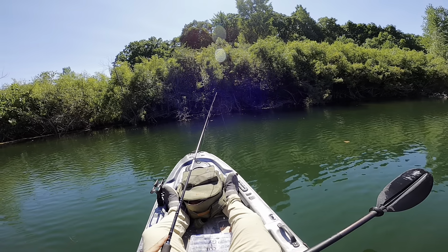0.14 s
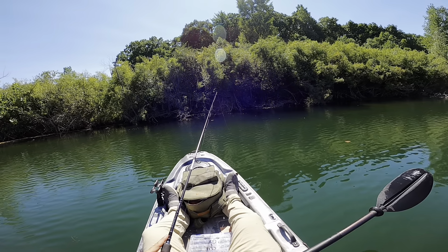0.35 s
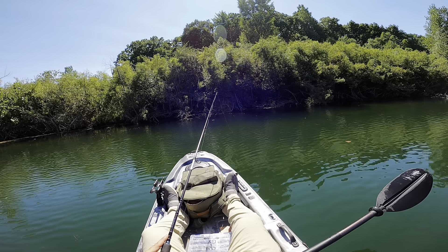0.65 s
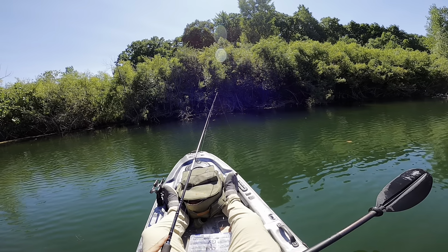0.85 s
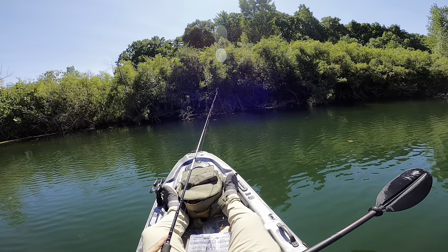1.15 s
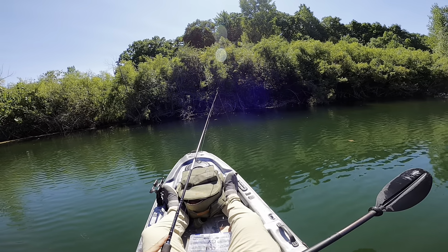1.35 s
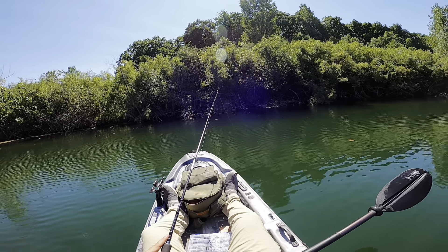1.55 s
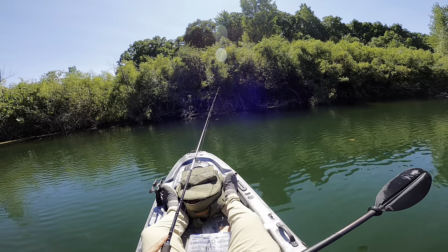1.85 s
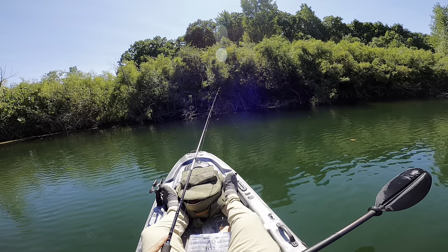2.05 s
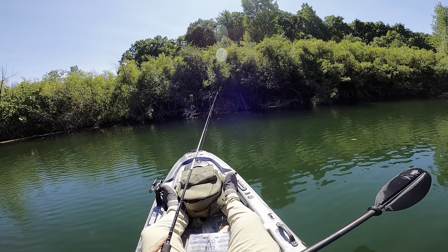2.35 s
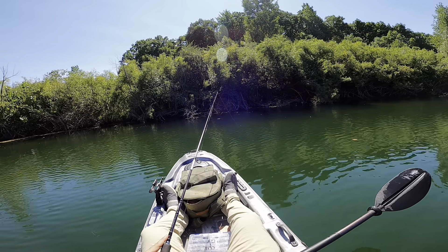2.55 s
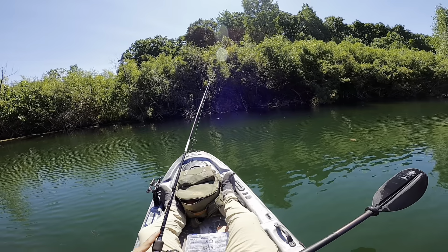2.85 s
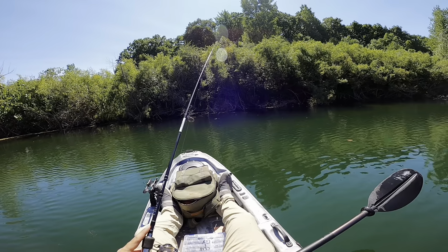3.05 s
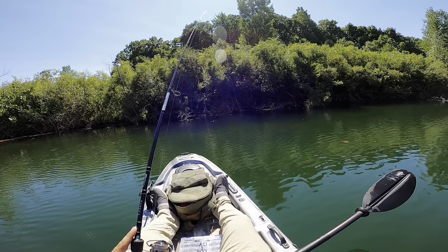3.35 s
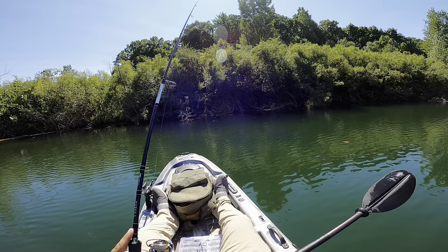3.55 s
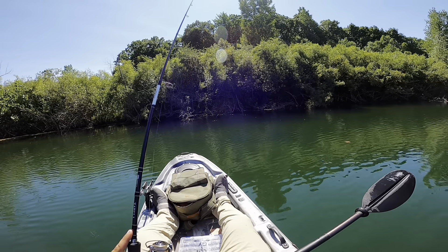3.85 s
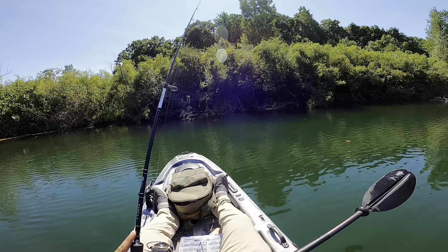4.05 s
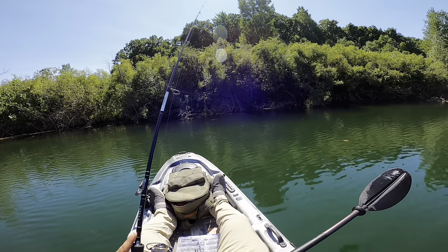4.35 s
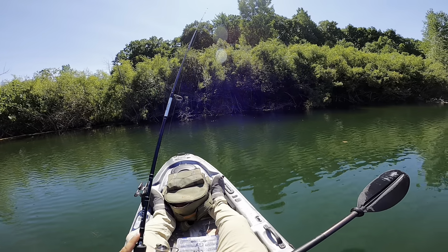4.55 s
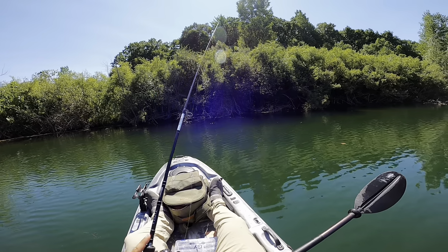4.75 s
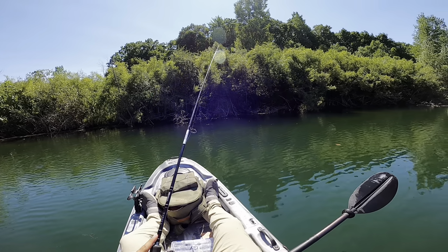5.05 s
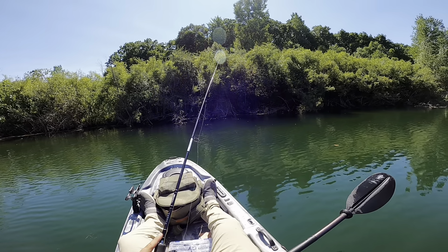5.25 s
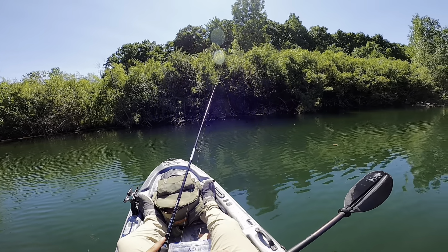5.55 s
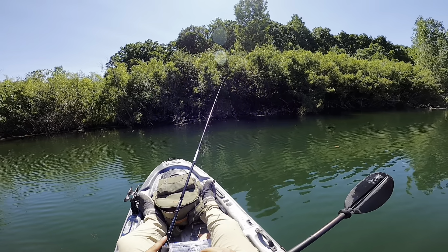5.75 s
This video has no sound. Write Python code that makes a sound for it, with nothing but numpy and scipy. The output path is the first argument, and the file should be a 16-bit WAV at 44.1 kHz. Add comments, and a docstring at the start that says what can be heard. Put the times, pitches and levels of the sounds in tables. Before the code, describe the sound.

A dense summer insect chorus fills the stereo field over soft leaf hush and distant traffic. A low engine drone is strongest in the first second, then drops in pitch and wavers. Quick rising bird chirps rattle at intervals, with a thin whistle between the last two bursts. A very high katydid rasp comes and goes; a sleeve brushes close by and a rod clicks dryly.

```python
"""A summer pond, from a kayak: cicadas and crickets on the wooded bank are bands of pulsing noise and a pure trill.
Right of the microphones a katydid ticks and buzzes, its wing strokes gating noise and a high ring.
A far engine hums in three wavering orders and slows down; far traffic and leaves are a hush of shaped noise.
A bird rattles bursts of rising chirps built from harmonics; another gives a thin whistle and a fainter short note.
Close by, a sleeve rustles in cloth-coloured noise as the angler moves the rod, which ticks twice in damped modes."""
import sys
import numpy as np
from scipy import signal
from scipy.fft import rfft, irfft, next_fast_len
from scipy.io import wavfile
from scipy.ndimage import uniform_filter1d

SR = 44100
rng = np.random.default_rng(int(sys.argv[2]) if len(sys.argv) > 2 else 0)


def digitize_waveform(pressure):
    """Quantize a signal to 16-bit integers and store it at the path in sys.argv[1].

    Rows of a 2-D input are taken as channels; values are limited to [-1, 1].
    """
    field = np.atleast_2d(pressure).T
    bounded = np.clip(field, -1, 1)
    quanta = np.round(bounded * 32767).astype(np.int16)
    wavfile.write(sys.argv[1], SR, quanta)


N = 260410
T = np.arange(N) / SR  # time [s]


def undb(db):
    """Decibels to an amplitude factor."""
    return 10 ** (np.asarray(db) / 20)


def unit(x):
    """Scale to rms 1."""
    return x / np.sqrt(np.mean(x ** 2))


def curves(table):
    """Columns of a (time, value, ...) table at every sample."""
    times, *columns = np.transpose(table)
    return [np.interp(T, times, column) for column in columns]


def over_hz(table, hz):
    """Read a (frequency, value) table on a log frequency axis."""
    freqs, values = np.transpose(table)
    return np.interp(np.log(hz + 1), np.log(freqs), values)


def pan(db):
    """Gains of left and right for a left minus right level difference."""
    return undb(np.array([[db], [-db]]) / 2)


def bump(t, width):
    """Bell-shaped swell around zero."""
    return np.exp(-(t / width) ** 2)


def gate(start, end, attack, release):
    """Ramp up from the start, hold, ramp down after the end."""
    rising = (T - start) / attack
    falling = 1 + (end - T) / release
    return np.clip(np.minimum(rising, falling), 0, 1)


def noise(gain_at, alike, pan_db):
    """Coloured noise, partly the same in both channels; mid rms near 1 before panning."""
    size = next_fast_len(N)
    alike = np.clip(alike, 0, 1)
    gain = gain_at(np.arange(size // 2 + 1) * SR / size)
    mid, side = irfft(rfft(rng.standard_normal((2, size))) * gain, size)[:, :N]
    opposite = side * np.array([[1], [-1]])
    return pan(pan_db) * (np.sqrt(1 + alike) * mid + np.sqrt(1 - alike) * opposite) / np.std(mid)


def coloured(table, alike, pan_db):
    """Noise with the spectrum of a table, silent outside it."""
    lowest, highest = table[0][0], table[-1][0]
    return noise(lambda hz: undb(over_hz(table, hz)) * (hz > lowest) * (hz < highest), alike, pan_db)


def walk(rate):
    """Random levels held 1 / rate s and slewed twice; spread 1."""
    k = int(SR / rate)
    steps = np.repeat(rng.standard_normal(N // k + 1), k)
    w = uniform_filter1d(uniform_filter1d(steps, k), k)[:N]
    return unit(w - w.mean())


def throb(rate, sharp, drift):
    """One smooth bump per pulse at a slightly wandering rate; rms 1."""
    phase = 2 * np.pi * np.cumsum(rate * (1 + drift * walk(6))) / SR
    return unit(np.exp(sharp * np.cos(phase)))


def bank(x, wet_db, t60):
    """Scattered echoes from trees and water: decaying noise, different in each channel."""
    t = T[:SR]
    tail = rng.standard_normal((2, len(t))) * np.exp(-np.log(1000) * t / t60) * (t > .004)
    tail /= np.sqrt(np.sum(tail ** 2, axis=1, keepdims=True))
    return x + undb(wet_db) * signal.fftconvolve(x[None], tail, axes=1)[:, :N]


# insect choirs on the bank: (centre [Hz], width at half amplitude [Hz], level [dB], pulse rate [1/s],
# throb depth [0-1], left minus right [dB], likeness of the channels [0-1])
CHOIR_BANDS = [(3840, 330, -64, 53.5, 0.18, 8, 0.8), (4202, 283, -63, 51.5, 0.25, 8.5, 0.5),
               (4430, 275, -66.5, 110, 0.35, 3.5, 0.12), (6430, 200, -71.5, 39, 0.52, -0.5, 0.34),
               (6700, 89, -75, 48, 0, 0, 0.33), (7550, 720, -71.5, 42, 0.14, 10.5, 0.52),
               (7160, 1840, -66.5, 33, 0.13, 6, 0.1), (8390, 950, -73.5, 41, 0.01, 11.5, 0.2),
               (5860, 190, -79.5, 26, 0, 8, 0.05), (4000, 46, -71.5, 50, 0, 4, 0.5)]


def choirs():
    """Many singers blur into noise in their body resonance; the nearest leave a throb at the pulse rate."""
    out = 0
    for hz, width, db, rate, depth, pan_db, alike in CHOIR_BANDS:
        band = noise(lambda f: 1 / (1 + (2 * (f - hz) / width) ** 4), alike, pan_db)
        depth = np.clip(depth, 0, 1)
        pulsing = 1 - depth + depth * throb(rate, 1.8, 0.0197)
        level = undb(db + 0.06 * walk(2.7) + 0.1 * walk(14))
        out = out + level * pulsing * band
    return out


# level of the one clear cricket: (time [s], level [dB])
CRICKET_LEVEL = [(0.6, -81), (0.8, -74), (1.4, -75), (2.7, -77), (3.7, -76), (4.1, -80), (5.9, -83)]
CRICKET_HZ, CRICKET_RATE = 3365, 38.2  # mean pitch [Hz], pulses per second


def cricket():
    """A steady trill of short pure pulses, with close echoes, to the left."""
    tone = np.sin(2 * np.pi * np.cumsum(CRICKET_HZ * (1 + .004 * walk(30))) / SR)
    pulses = throb(CRICKET_RATE, 2.5, .006) * tone
    level = undb(curves(CRICKET_LEVEL)[0] + 1.5 * walk(9))
    return bank(level * pulses, -9, .08) * pan(7)


# katydid's buzzes: (start [s], end [s], wing strokes [1/s], rasp level [dB], wing ring level [dB])
KATYDID_BUZZES = [(0, 0.662, 56, -76.5, -81), (0.92, 1.42, 52.4, -75, -77), (1.412, 1.856, 62, -76, -80),
                  (2.359, 3.631, 65, -75.5, -74.5), (3.897, 4.572, 58.6, -73.5, -82),
                  (4.56, 5.155, 61, -77.5, -78), (5.45, 5.9, 61, -74, -78)]
# its single ticks: (time [s], level before a common trim [dB])
KATYDID_TICKS = [(0.6038, -67), (0.6594, -63), (0.7063, -64), (0.7565, -65), (0.8135, -65), (0.8594, -69),
                 (1.9023, -79), (1.948, -82), (1.9897, -75), (2.0399, -73), (2.0881, -66), (2.144, -66),
                 (2.1935, -65), (2.2514, -69), (2.3053, -65), (3.6234, -64), (3.674, -62), (3.726, -63),
                 (3.7737, -62), (3.8292, -62), (3.8731, -66), (5.0494, -65), (5.1067, -63), (5.1682, -64),
                 (5.2242, -64), (5.2797, -69), (5.3358, -61)]
# rasp spectrum of the wing: (frequency [Hz], relative level per Hz [dB])
WING_SPECTRUM = [(8800, -2), (9700, -4), (10400, -1), (11000, -4), (12000, -2), (13000, -5), (13600, -2.5),
                 (14500, -4), (15300, -7), (15800, -24)]
# spectrum of the reverberant hiss: (frequency [Hz], relative level per Hz [dB])
REVERB_SPECTRUM = [(5180, -12.5), (8800, -8.5), (9300, -13.5), (9770, -12), (12000, -9.5), (12500, -9),
                   (14100, -16), (15200, -21), (15700, -36)]
# the high hiss dips while the katydid only ticks: (end of the fall [s], recovery [s], depth [dB])
HISS_LULLS = [(.6, .45, 7), (1.84, 0.49, 18.5), (3.62, 0.33, 6), (5.1, 0.31, 10)]
LULL_FALL_S = 0.044
RING_HZ = 12000  # centre of the wobbling wing ring
MIRROR_HZ, MIRROR_WIDTH_HZ = 12300, 600  # ringing cell of the wing under single ticks
REVERB_DB = -69  # hiss outside the lulls


def katydid():
    """Wing strokes gate a rasp of file teeth and ring the wing; the buzz scatters into a smooth reverberant hiss."""
    strokes, ring, ticks = np.zeros((3, N))
    uneven = undb(1.0 * walk(50))
    wobble = np.cumsum(120 * walk(250)) / SR  # in cycles
    for start, end, rate, rasp_db, ring_db in KATYDID_BUZZES:
        envelope = np.clip(np.minimum((T - start) / 0.02, (end - T) / 0.0091), 0, 1)
        beating = envelope * throb(rate, 0.84, 0.0061)
        strokes += undb(rasp_db) * beating
        ring += undb(ring_db) * beating
    ring *= np.sin(2 * np.pi * (RING_HZ * T + wobble))
    for s, db in KATYDID_TICKS:
        u = np.clip((T - s + .003) / 0.0072, 0, 50)
        ticks += undb(db - 7.5) * u * np.exp(1 - u)
    cell = noise(lambda f: 1 / (1 + (2 * (f - MIRROR_HZ) / MIRROR_WIDTH_HZ) ** 2), 0.55, -12)
    rasp = (strokes + ticks) * coloured(WING_SPECTRUM, 0.64, -6)
    direct = rasp + undb(-6) * ticks * cell + ring * pan(-14)
    lull_db = sum(depth_db * gate(s - LULL_FALL_S, s, LULL_FALL_S, back) for s, back, depth_db in HISS_LULLS)
    hiss_level = undb(REVERB_DB - lull_db + 1.0 * walk(25.04))
    return uneven * direct + hiss_level * coloured(REVERB_SPECTRUM, 0.12, -2.0)


# spectrum of the engine's rumble: (frequency [Hz], relative level per Hz [dB])
RUMBLE_SPECTRUM = [(20, -6), (35, 9), (45, 16.5), (60, 10), (80, 9.5), (120, 1), (160, -1), (220, -5.5),
                   (300, -18.5), (400, -23.5)]
# rise and fall of the rumble: (time [s], level [dB])
RUMBLE_LEVEL = [(0, -44.5), (.9, -43.5), (1.35, -49.5), (2.9, -50.5), (3.6, -48.5), (5.9, -47)]
LOAD_HZ, IDLE_HZ = 60.3, 50.3  # mean firing rate
THROTTLE_OFF_S, SLOWING_S = .63, 0.3015  # start and length of the slowing
# levels (under load, at idle) [dB]
FIRING_DB, SECOND_ORDER_DB, THIRD_ORDER_DB = (-31.5, -45.5), (-62, -50.5), (-66, -61.5)


def engine():
    """Firing tone and its orders waver on the way over the water; a rumble goes with them."""
    idle = np.clip((T - THROTTLE_OFF_S) / SLOWING_S, 0, 1)

    def level(pair):
        """Slide from the load level to the idle level."""
        return undb(pair[0] + (pair[1] - pair[0]) * idle)

    hz = LOAD_HZ + (IDLE_HZ - LOAD_HZ) * idle + .5 * walk(4)
    phase = 2 * np.pi * np.cumsum(hz) / SR
    # the firing tone is steady under load, uneven at idle
    tone = level(FIRING_DB) * undb((-0.15 + 3.47 * idle) * walk(10)) * np.sin(phase)
    tone += level(SECOND_ORDER_DB) * undb(2.75 * walk(9)) * np.sin(2 * phase)
    tone += level(THIRD_ORDER_DB) * undb(3.4 * walk(5)) * np.sin(3 * phase)
    rumble_level = undb(curves(RUMBLE_LEVEL)[0] + 0.56 * walk(2.36))
    rumble = rumble_level * coloured(RUMBLE_SPECTRUM, 0.93, 2.1)
    return np.sqrt(2) * tone * pan(2.3) + rumble


# spectrum of the far traffic: (frequency [Hz], relative level per Hz [dB])
TRAFFIC_SPECTRUM = [(200, -1.5), (400, -2), (700, -10), (1100, -2.5), (1500, -7), (2200, -20), (2600, -33)]
# rise and fall of the traffic: (time [s], level [dB])
TRAFFIC_LEVEL = [(0.0, -64), (0.43, -62.5), (0.85, -65.5), (2.7, -67), (3.09, -64), (3.42, -67.5),
                 (5.06, -67.5), (5.45, -64.5), (5.9, -67.5)]


def traffic():
    """Far traffic merges into low noise that slowly swells."""
    return undb(curves(TRAFFIC_LEVEL)[0] + 0.34 * walk(5.4)) * coloured(TRAFFIC_SPECTRUM, 0.55, 1.3)


# spectrum of the hush of leaves: (frequency [Hz], relative level per Hz [dB])
LEAVES_SPECTRUM = [(1500, 2.5), (2200, 1.5), (2900, -1), (3600, 7.5), (5200, 8.5), (9000, -3.5),
                   (11000, -41)]
LEAVES_DB = -67.5


def leaves():
    """Countless small rustles blur into an unsteady hush of noise."""
    return undb(LEAVES_DB + 2.3 * walk(11)) * coloured(LEAVES_SPECTRUM, 0.71, 4.1)


# rattling bird: (time of first accent [s], level [dB], end pitch [Hz], croak over second harmonic [dB])
RATTLE_CHIRPS = [(0.0242, -59, 1210, -4), (0.0952, -60, 1170, -3), (1.2633, -62.5, 1190, -4),
                 (1.314, -53.5, 1090, -8), (1.3777, -51.5, 1135, -3.5), (1.4418, -52, 1200, -6),
                 (1.5046, -47, 1230, -13), (1.5747, -49, 1182, -8), (1.6553, -49, 1130, -6),
                 (2.866, -52, 1075, -3), (2.9118, -52.5, 1130, -5), (2.965, -59, 1230, -4),
                 (3.017, -50.5, 1120, -9), (3.0769, -49.5, 1166, -6), (3.1404, -47, 1197, -10),
                 (3.2075, -48.5, 1160, 0), (4.3516, -64, 1140, -4), (4.392, -47.5, 1160, -15),
                 (4.4382, -54.5, 1114, -3), (4.4922, -49, 1242, -10), (4.5484, -48.5, 1160, -8),
                 (4.6059, -49, 1250, -9), (4.6716, -46, 1158, -9.5), (4.7343, -47.5, 1190, -4.5),
                 (4.8034, -48.5, 1162, -6.5)]
CHIRP_HZ = 1023  # pitch at the first accent
CROAK_LEAD_S, RISE_HZ_PER_S = 0.0032, 14000  # the croak leads the first accent; pitch slope up to there
GLIDE_S, GLIDE_S_PER_HZ = 0.0059, 3.5e-5  # a wider glide takes longer
ACCENT_DB, ACCENT_DB_PER_HZ = -16, 0.0892  # and ends in a stronger second accent
THROAT_HZ, THROAT_WIDTH_HZ = 3450, 230  # resonance that the third harmonic sweeps through
TOP_PER_CROAK = 0.39  # harsher chirps also ring the throat more [dB per dB]
# mean levels: first harmonic, third harmonic late and early (dB over the second harmonic),
# lower and upper croak line (dB over the croak); each chirp scatters around them
PARTIALS_DB, PARTIAL_SCATTER_DB = [-7, -1.5, -10, -1, 0], 1.2


def rattler():
    """Each chirp starts in a croak of alternating strong and weak cycles, then three harmonics glide up."""
    out = np.zeros(N)
    lead = SR // 50  # samples before the first accent
    t = np.arange(-lead, SR // 25) / SR
    scatter = PARTIAL_SCATTER_DB * rng.standard_normal((len(RATTLE_CHIRPS), len(PARTIALS_DB)))
    for (s, db, end_hz, croak_db), partials in zip(RATTLE_CHIRPS, PARTIALS_DB + scatter):
        first_db, late_db, early_db, low_db, high_db = partials
        rise = end_hz - CHIRP_HZ
        gap = GLIDE_S + GLIDE_S_PER_HZ * rise
        accent_db = ACCENT_DB + ACCENT_DB_PER_HZ * rise
        glide = np.sin(np.pi / 2 * np.clip(t / gap, 0, 1)) ** 1.57
        hz = CHIRP_HZ + RISE_HZ_PER_S * np.minimum(t, 0) + rise * glide
        phase = 2 * np.pi * np.cumsum(hz) / SR
        first = undb(first_db) * bump(t - 0.62 * gap, 0.0095)
        second = bump(t, 0.0047) + undb(accent_db) * bump(t - gap, 0.0037)
        throat = bump(3 * hz - THROAT_HZ, THROAT_WIDTH_HZ)
        third = undb(early_db) * bump(t - .001, 0.005)
        third += undb(late_db + TOP_PER_CROAK * croak_db) * bump(t - gap, .007) * throat
        # the alternation puts lines halfway between the harmonics
        croak = undb(low_db) * np.sin(1.5 * phase) + undb(high_db) * np.sin(2.5 * phase)
        croak *= undb(croak_db) * bump(t + CROAK_LEAD_S, 0.0051)
        note = first * np.sin(phase) + second * np.sin(2 * phase) + third * np.sin(3 * phase)
        i = int(s * SR) - lead
        out[i:i + len(t)] += (undb(db) * (note + croak))[:N - i]
    out *= undb(2.5 * walk(400))
    near, far = bank(out, -10, .06), bank(out, -8, .9)
    return (near + far - out) * pan(0.76)  # the direct sound counts once


# sleeve sliding close to the microphones: (start [s], end [s], level [dB])
SLEEVE_SLIDES = [(2.95, 3.31, -59.5), (4.795, 5.74, -66.5)]
SLEEVE_ATTACK_S, SLEEVE_RELEASE_S = .12, .07
# spectrum of the cloth: (frequency [Hz], relative level per Hz [dB])
CLOTH_SPECTRUM = [(250, -20), (380, 2.5), (550, -8.5), (800, -19.5), (1200, -10.5), (2000, -15.5),
                  (3200, -16), (6000, -23.5), (9000, -38)]
# ticks of the rod: (time [s], level [dB])
ROD_TICKS = [(2.975, -61), (4.5043, -42)]
# modes of the rod: (frequency [Hz], relative level [dB], decay by 60 dB [s])
ROD_MODES = [(1050, -10, .012), (1920, 0, .01), (2790, 5, 0.008), (5150, 4, 0.01), (5550, 8, 0.011),
             (6000, 7, .009)]
CONTACT_S, ROD_PAN_DB = .0006, 7  # onset time; the ticks are louder on the left


def angler():
    """Cloth slides in uneven rustles of noise; the rod gives dry ticks of fast-damped modes."""
    slide = sum(undb(db) * gate(s0, s1, SLEEVE_ATTACK_S, SLEEVE_RELEASE_S) for s0, s1, db in SLEEVE_SLIDES)
    out = slide * undb(1.3 * walk(25)) * coloured(CLOTH_SPECTRUM, 1.0, 0.54)
    for s, db in ROD_TICKS:
        t = np.clip(T - s, 0, 1)
        modes = 0
        for hz, mode_db, t60 in ROD_MODES:
            modes = modes + undb(mode_db) * np.exp(-np.log(1000) * t / t60) * np.sin(2 * np.pi * hz * t)
        out += undb(db) * pan(ROD_PAN_DB) * (1 - np.exp(-t / CONTACT_S)) * modes
    return out


# whistling bird: (start [s], length [s], third harmonic at the start [Hz], level before the swell [dB])
WHISTLE_NOTES = [(3.42, .225, 2540, -63.5), (3.69, 0.052, 2460, -75)]
WHISTLE_ATTACK_S, WHISTLE_RELEASE_S, WHISTLE_SWELL_DB_PER_S = 0.03, 0.014, 15
SAG_HZ_PER_S, DROP_HZ = 180, 60  # of the third harmonic; the drop takes the last 50 ms
SECOND_DB, FOURTH_DB, FOURTH_FADE_DB_PER_S = -14, -1, 40  # over the third harmonic


def whistler():
    """A thin held note that swells, sags in pitch and drops at its end; its upper harmonic is breathy."""
    out = 0
    blur = .6 * walk(70)  # phase jitter [rad]
    for s, hold, start_hz, db in WHISTLE_NOTES:
        hz = start_hz - SAG_HZ_PER_S * (T - s) - DROP_HZ * gate(s + hold - .05, 9, .05, 1)
        phase = 2 * np.pi * np.cumsum(hz * (1 + .002 * walk(60))) / SR / 3  # of the fundamental
        fourth_db = FOURTH_DB - FOURTH_FADE_DB_PER_S * np.clip(T - s, 0, 1)
        tone = np.sin(3 * phase) + undb(SECOND_DB) * np.sin(2 * phase)
        tone += undb(fourth_db) * np.sin(4 * phase + blur)
        envelope = gate(s, s + hold, WHISTLE_ATTACK_S, WHISTLE_RELEASE_S) ** 2
        out = out + undb(db + WHISTLE_SWELL_DB_PER_S * (T - s)) * envelope * tone
    return bank(np.sqrt(2) * undb(.8 * walk(50)) * out, -8, .25) * pan(3.5)


def scene():
    """All singers, the engine and the angler over the hush of far traffic and leaves."""
    insects = choirs() + cricket() + katydid()
    birds = rattler() + whistler()
    return insects + engine() + traffic() + leaves() + birds + angler()


# rough phase between the channels, by frequency band: (frequency [Hz], lead of the left [rad])
CHANNEL_PHASE = [(30, -0.06), (120, -0.12), (300, -0.3), (800, -1.02), (3300, -0.87), (4200, -0.96),
                 (5900, 3), (6400, 3.0), (8000, 3.5), (9300, 4.5), (15000, 7.5)]
TOP_HZ = 15700  # upper band edge


def record(dry):
    """The left channel is turned in phase by band; the top is cut."""
    size = next_fast_len(N + SR)
    margin = SR // 4
    turn = np.exp(1j * over_hz(CHANNEL_PHASE, np.arange(size // 2 + 1) * SR / size))
    left = np.pad(dry[0], margin, "reflect", reflect_type="odd")
    turned = irfft(rfft(left, size) * turn, size)[margin:margin + N]
    low_pass = signal.ellip(10, .2, 80, TOP_HZ, fs=SR, output="sos")
    return signal.sosfilt(low_pass, np.array([turned, dry[1]]))


dry = scene()
out = record(dry)
digitize_waveform(out)
```